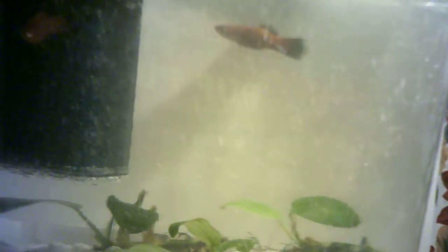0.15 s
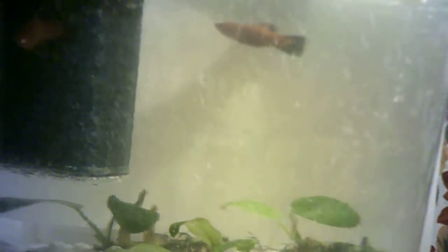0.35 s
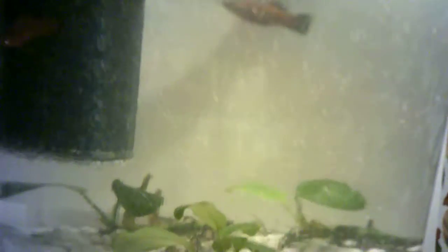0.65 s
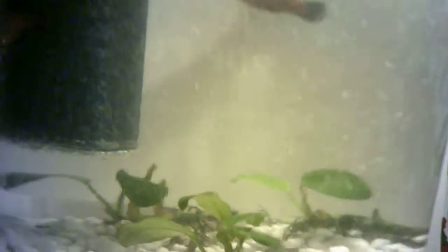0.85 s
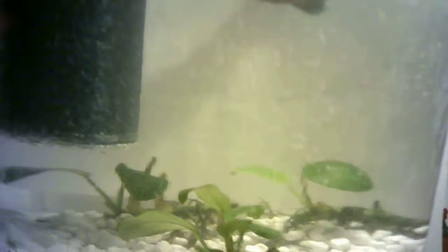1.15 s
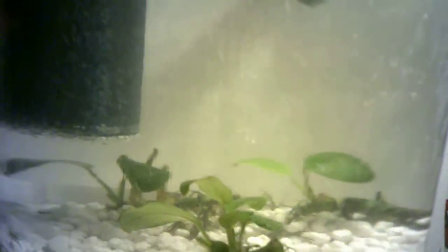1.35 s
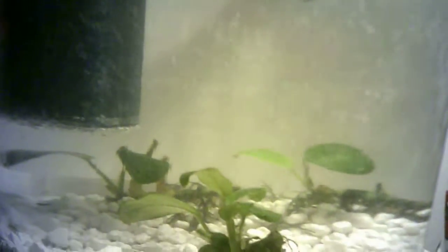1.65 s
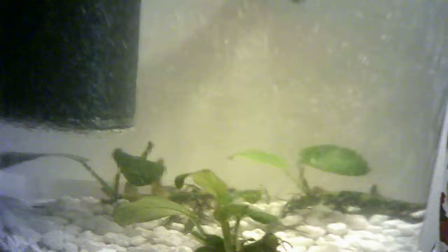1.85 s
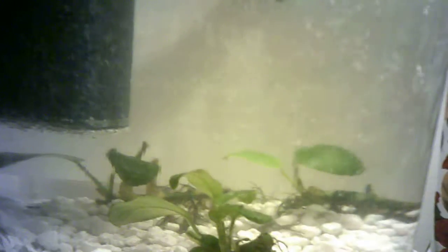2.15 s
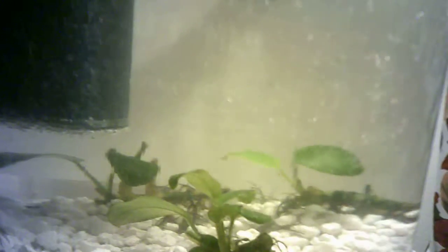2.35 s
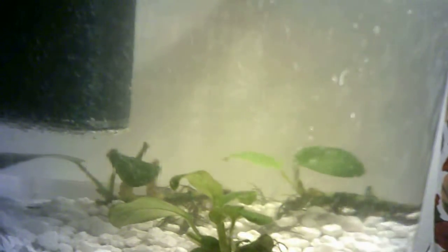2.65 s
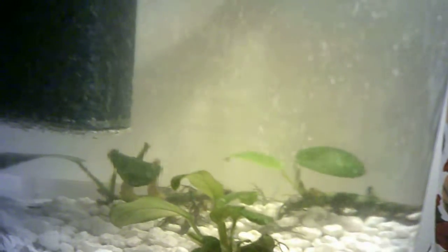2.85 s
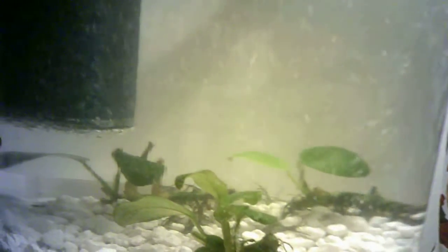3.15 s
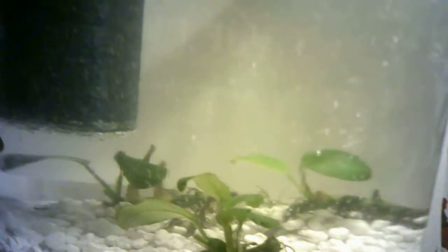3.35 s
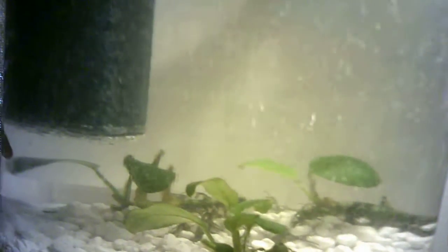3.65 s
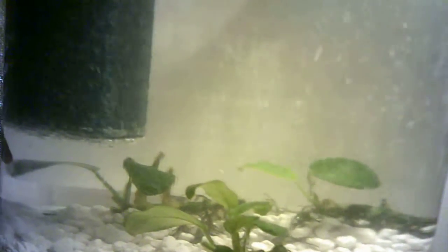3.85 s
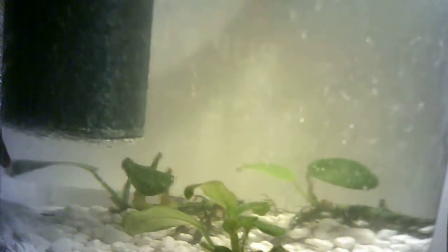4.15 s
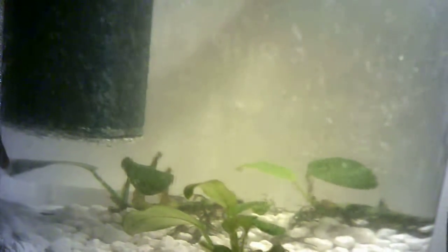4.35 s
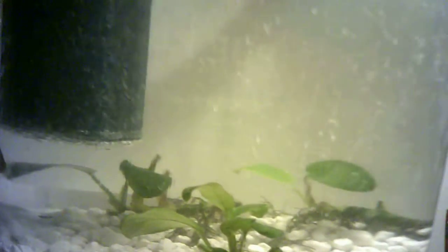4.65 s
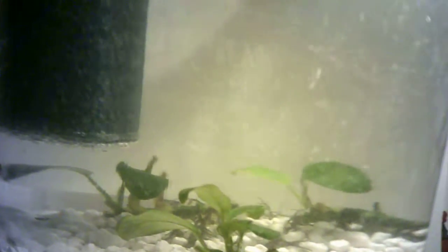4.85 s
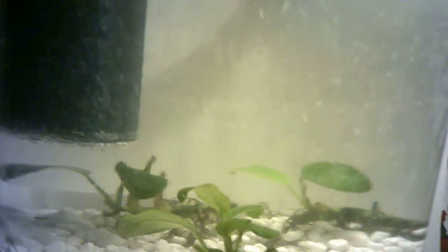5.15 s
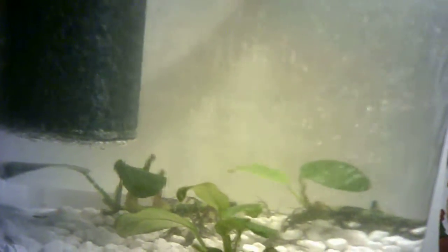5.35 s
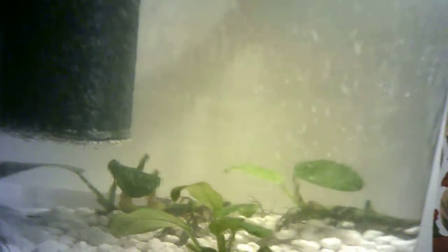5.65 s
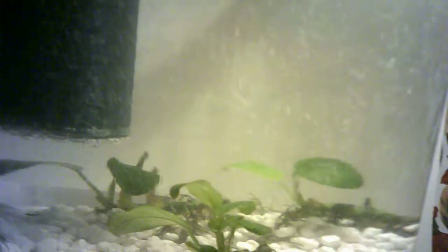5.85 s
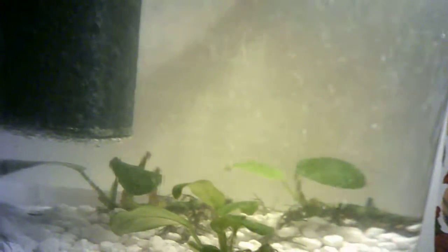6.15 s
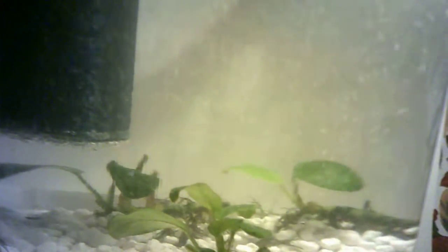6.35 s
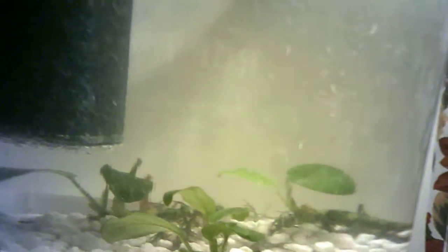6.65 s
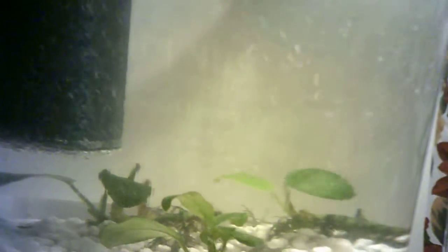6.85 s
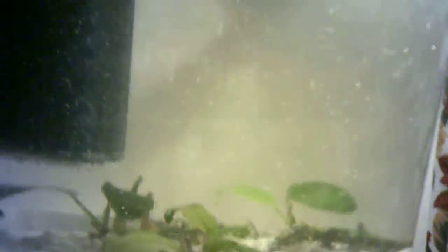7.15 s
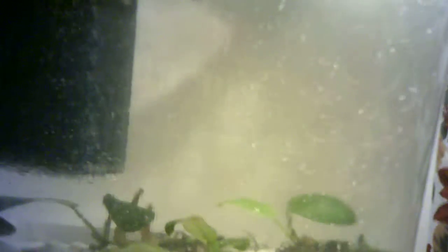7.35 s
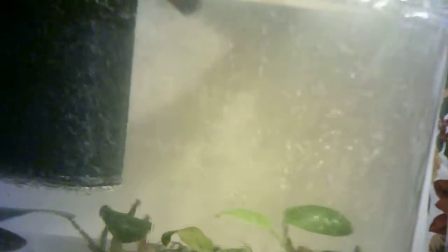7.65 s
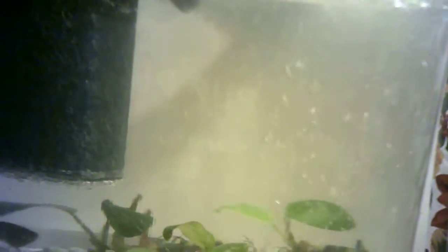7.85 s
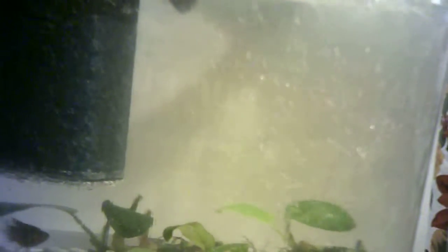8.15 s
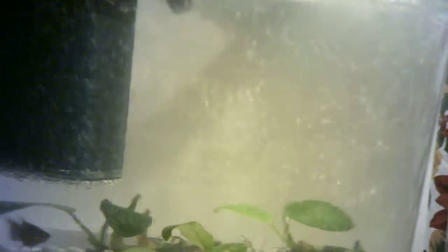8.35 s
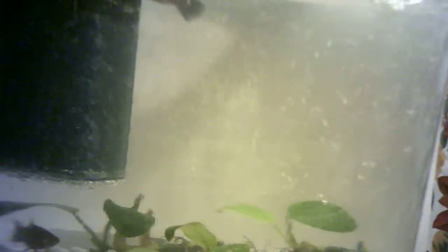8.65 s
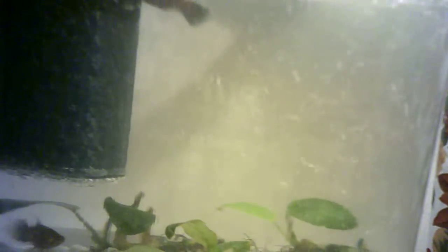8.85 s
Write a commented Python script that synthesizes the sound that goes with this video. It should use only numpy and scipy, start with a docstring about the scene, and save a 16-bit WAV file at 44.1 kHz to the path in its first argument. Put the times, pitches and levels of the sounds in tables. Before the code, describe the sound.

For nine seconds a small aquarium filter runs close to a handheld microphone in a small room. A low mains hum with faint upper tones sits in soft rumbling noise, its lowest tone weakening slightly after 3 s. Over it runs a quiet, continuous fizzing trickle with irregular clear plinks and glassy pings, some mellow, some high and very short. Soft rising gulps of air come at 0.2, 0.8 and 1.2 s, then mainly between 4 and 7.4 s. At about 0.55 s a hand slips in a quick stuttering rasp with a deep bump; a weaker thud comes at 4.1 s. The clearest knock is at 1.2 s, with duller ones near 3, 4, 4.6, 6.3 and 7 s. A distant engine drones outside, booming briefly around 1.7 and 5.1 s, strongest from 5.5 to 7 s, slightly falling in pitch, then receding. The trickle and drips continue to the end.

```python
"""Fish tank in a room: a small filter pump hums, its outflow trickles, pings the glass and swallows air.
A far engine drones past outside, a few knocks sound, a hand slips on the microphone housing and bumps it.
Hum and engine are sums of sines; rush, rasp and knocks are shaped noise.
Bubbles are decaying tones or clicks through resonators; a short noise tail is the room's answer to the water."""
import sys
import numpy as np
from scipy import signal
from scipy.fft import rfft, irfft
from scipy.io import wavfile

SR = 44100
rng = np.random.default_rng(int(sys.argv[2]) if len(sys.argv) > 2 else 0)


def generate_wav(signal):
    """Clip the signal to [-1, 1] and save it as 16-bit WAV at the path in sys.argv[1]."""
    frames = np.transpose(np.atleast_2d(signal))
    scaled = np.clip(frames, -1, 1) * 32767
    pcm = np.round(scaled).astype(np.int16)
    wavfile.write(sys.argv[1], SR, pcm)


N = 396900
TIME = np.arange(N) / SR


def amp(db):
    """Amplitude ratio of a level in dB."""
    return 10 ** (np.asarray(db) / 20)


def rms_one(x):
    """x scaled to an rms of 1."""
    return x / np.sqrt(np.mean(x ** 2) + 1e-20)


def in_time(rows):
    """Columns after the first, interpolated linearly over TIME."""
    s, *columns = np.transpose(rows)
    return [np.interp(TIME, s, column) for column in columns]


def coloured(x, spectrum):
    """x filtered by (hz, db) points joined on a log frequency axis."""
    hz, db = np.transpose(spectrum)
    bins_hz = np.arange(N // 2 + 1) * SR / N + 1e-3  # offset avoids log(0)
    gain = amp(np.interp(np.log(bins_hz), np.log(hz), db))
    return irfft(rfft(x) * gain, N)


def band(x, low_hz, high_hz):
    """Butterworth bandpass."""
    sos = signal.butter(2, [low_hz, min(high_hz, SR / 2.2)], "band", fs=SR, output="sos")
    return signal.sosfilt(sos, x)


def lowpass_both_ways(x, edge_hz):
    """Zero-phase lowpass, so that x minus the result is the rest of the spectrum."""
    return signal.sosfiltfilt(signal.butter(2, edge_hz, fs=SR, output="sos"), x)


def drift(rate_hz):
    """Slow random curve of rms 1: noise through a double pole, run at SR / 40."""
    r = np.exp(-80 * np.pi * rate_hz / SR)
    noise = rng.standard_normal(N // 40 + 2002)
    slow = signal.lfilter([1], [1, -2 * r, r * r], noise)[2000:]  # drop the run-in
    return np.interp(np.arange(N) / 40, np.arange(len(slow)), rms_one(slow))


def resonance(x, hz, width_hz):
    """Two-pole resonator with unit gain near its peak."""
    r = np.exp(-np.pi * width_hz / SR)
    zeros = [(1 - r * r) / 2, 0, (r * r - 1) / 2]
    poles = [1, -2 * r * np.cos(2 * np.pi * hz / SR), r * r]
    return signal.lfilter(zeros, poles, x + 1e-18)


def add(out, start_s, sound):
    """Mix sound into out, in place."""
    at = round(start_s * SR)
    out[at:at + len(sound)] += sound[:N - at]


def grains(per_s, spread_db):
    """Random clicks of uneven size and either sign that come in clumps."""
    sizes = amp(spread_db * np.minimum(rng.exponential(1, N), 5)) * rng.choice([-1, 1], N)
    chance = per_s * amp(2.5 * drift(5)) / SR
    return sizes * (rng.random(N) < chance)


def bubbles(per_s, spread_db, low_hz, high_hz, sharpness):
    """Each grain is dealt to one of 20 bubble sizes; small ones are quieter, all start softly."""
    born, dealt, out = grains(per_s, spread_db), rng.integers(0, 20, N), 0
    for k, hz in enumerate(np.geomspace(low_hz, high_hz, 20)):
        soft_start = resonance(born * (dealt == k), hz, hz / 4)
        out = out + resonance(soft_start, hz, hz / sharpness) * (hz / 1000) ** -.6
    return rms_one(out)


# noise of water, room and street, relative: pitch_hz, density_db [dB per Hz]
RUSH_SPECTRUM = [(8, -8.5), (22, 6.5), (40, -2.5), (63, -9), (110, -14.5), (196, -17), (275, -21),
                 (430, -23), (520, -30.5), (1620, -32.5), (2480, -45), (2830, -40), (3100, -51.5),
                 (4100, -49.5), (4850, -60), (5650, -62.5), (5900, -54.5), (7500, -55.5), (8400, -45.5),
                 (8800, -65.5)]
RUSH_DB = -37
RUMBLE_SWELL_DB, RUMBLE_SWELL_HZ, RUMBLE_FADE_DB_PER_S = 1.5, 1, -0.07


def rush():
    """Shaped noise: the rumble swells slowly as it fades, the bands above flicker."""
    noise = rms_one(coloured(rng.standard_normal(N), RUSH_SPECTRUM))
    rumble = lowpass_both_ways(noise, 200)
    rest = noise - rumble
    out = rumble * amp(RUMBLE_SWELL_DB * drift(RUMBLE_SWELL_HZ) + RUMBLE_FADE_DB_PER_S * TIME)
    for edge_hz in (900, 1800, 3200, 5000):
        part = lowpass_both_ways(rest, edge_hz)
        flicker_db = np.log2(edge_hz / 700) * 1.2 * drift(19)
        out, rest = out + part * amp(flicker_db), rest - part
    top = rest * amp(2.86 * drift(39) + 2.3 * drift(120))
    return amp(RUSH_DB) * (out + top)


# engine's path to the room, points on gliding curves: time_s, level_db, echo_lag_ms, echo_strength [0-1]
ENGINE_PATH = [(0, -65.5, 10.4, 0.6), (.7, -59.5, 11.2, 0.73), (1.5, -54.5, 11.3, 0.28),
               (2.2, -57.5, 14.2, 1), (3, -57.5, 14.5, 0.82), (4, -60.5, 13.7, 0.9), (4.8, -59, 13.2, 0.7),
               (5.5, -48, 15.3, 0.42), (6, -46.5, 17, 0), (6.6, -46.5, 21.3, 0.22),
               (7.2, -47.5, 20.7, 0.27), (8, -52.5, 20.7, 0.5), (9, -56, 18.3, 0.18)]
# firing rate, points on a gliding curve: time_s, firing_hz
FIRING_RATE = [(0, 19.7), (.5, 19.95), (1.5, 20.1), (2.1, 19.5), (4.6, 19.45), (5.5, 19.2), (7.5, 18.47),
               (9, 18.45)]
# firing orders heard: order -> level_db re path level
ORDER_LEVELS = {4: 2.9, 5: 6.56, 6: -1.7, 7: 0.57, 8: 0.7, 9: 3.5, 10: -6.5, 11: -9.5}
# room mode booming now and then: peak_s, level_db, width_s
BOOM_SWELLS = [(1.03, -51, 0.16), (1.7, -45.5, 0.21), (3.45, -47, .1), (4.65, -51, 0.28), (5.15, -41, 0.33)]
BOOM_HZ = 158.9


def engine():
    """Low firing orders; a wall echo of shifting lag lifts some, cancels others; a room mode booms."""
    (firing_hz,), (level_db, lag_ms, echo) = in_time(FIRING_RATE), in_time(ENGINE_PATH)
    turn = 2 * np.pi * np.cumsum(firing_hz) / SR
    late = 2 * np.pi * firing_hz * lag_ms / 1000
    orders = 0
    for order, db in ORDER_LEVELS.items():
        phase = order * turn + rng.uniform(0, 2 * np.pi)
        both = np.sin(phase) + np.clip(echo, 0, 1) * np.sin(phase - order * late)
        orders = orders + np.sqrt(2) * amp(level_db + db + 1.5 * drift(2.2)) * both
    boom = resonance(resonance(rng.standard_normal(N), BOOM_HZ, 9), BOOM_HZ, 9)
    swells = sum(amp(db) * np.exp(-((TIME - s) / width_s) ** 2) for s, db, width_s in BOOM_SWELLS)
    return orders + swells * rms_one(boom)


# knocks in the room: start_s, level_db, low_hz, high_hz, t60_s, bright_db [re body]
KNOCK_EVENTS = [(1.22, -32, 1243, 1917, 0.11, -10.5), (2.981, -43, 870, 1300, .13, -20),
                (3.997, -45, 1520, 2390, 0.056, -15), (4.112, -42.5, 726, 1500, 0.19, -22),
                (4.572, -36, 778, 1740, 0.21, -30), (6.271, -40.5, 1120, 1364, 0.19, -9),
                (6.386, -55, 990, 1200, .084, -28), (6.966, -51, 2240, 2880, .1, -11)]
RINGS, RING_DB = 5, -7.5  # pitches within a knock, level re knock


def knocks():
    """A noise burst builds in a few ms and dies; pitches within its band ring in quick succession."""
    out, t = np.zeros(N), TIME[:SR // 3]
    noise = rng.standard_normal((len(KNOCK_EVENTS), 2, len(t)))
    chance = rng.random((len(KNOCK_EVENTS), RINGS, 2))
    for (s, db, low_hz, high_hz, t60_s, bright_db), (dull, crisp), rings in zip(KNOCK_EVENTS, noise, chance):
        bright = band(band(crisp, 2000, 2950) + band(crisp, 3500, 3960), 1900, 5400)
        narrow = band(band(dull, low_hz, high_hz), low_hz, high_hz)
        body = rms_one(band(narrow, low_hz * 0.54, high_hz))
        decay = amp(-60 * t / t60_s) + .5 * amp(-60 * t / 0.064)
        shape = np.minimum(t / 0.0085, 1) ** 2 * decay
        add(out, s, amp(db) * shape * (body + amp(bright_db) * rms_one(bright)))
        for k, (pitch, late) in enumerate(rings):
            hz = low_hz + (high_hz - low_hz) * (k + pitch) / RINGS
            envelope = amp(db + RING_DB - 60 * t / 0.12) * np.minimum(t / 0.0045, 1)
            add(out, s + 0.00296 + 0.024 * late, envelope * np.sin(2 * np.pi * hz * t))
    return out


# hand slipping in three catches: start_s, level_db [before the slide], length_s
SLIP_CATCHES = [(0.532, -28, 0.023), (0.559, -35, .016), (0.576, -35.5, 0.0237)]
# rasp of skin, relative: pitch_hz, density_db [dB per Hz]
SLIP_SPECTRUM = [(240, -43), (400, -13), (869, -10.5), (1110, -16), (1720, -7.5), (2230, -14),
                 (2890, -10.5), (3990, -9.5), (5040, -24), (7430, -24.5), (8790, -12), (11400, -67),
                 (19300, -120)]
# housing resonance, one row: pitch_hz, width_hz, level_db [re rasp]
HOUSING_RING = (2890, 180, 10.6)
# shoves on the microphone: start_s, level_db, pitch_hz [once settled], t60_s
SHOVES = [(.538, -15, 20, .22), (4.087, -23, 20, .25)]
CATCH_S, SLIDE_DB_PER_S, LET_GO_S = 0.0072, -250, 0.0061


def slip():
    """Skin rasps over the housing; shoves reach the capsule as low swings that die away."""
    hz, width_hz, ring_db = HOUSING_RING
    grip_and_release_db = 0.94 * rng.standard_normal(N // 60 + 1).repeat(60)[:N]
    catching = rng.standard_normal(N) * amp(grip_and_release_db)
    rasp = rms_one(coloured(catching, SLIP_SPECTRUM))
    rasp = rms_one(rasp + amp(ring_db) * resonance(rasp, hz, width_hz))
    grip = 0
    for s, db, length_s in SLIP_CATCHES:
        level = amp(db + SLIDE_DB_PER_S * np.clip(TIME - s, 0, length_s))
        catch = np.clip((TIME - s) / CATCH_S, 0, 1)
        let_go = np.clip((s + length_s - TIME) / LET_GO_S + 1, 0, 1)
        grip = grip + level * catch * let_go
    out, t = grip * rasp, TIME[:SR // 4]
    for s, db, hz, t60_s in SHOVES:
        turns = hz * t + .28 * (1 - np.exp(-t / .006))  # first swing is quickest
        add(out, s, -amp(db - 60 * t / t60_s) * np.sin(2 * np.pi * turns))
    return out


# pump coil, near multiples of the mains: pitch_hz, level_db [rms]; sag is added to the lowest
HUM_LINES = [(59.9, -41), (119.8, -57), (239.6, -57.5), (300, -54.5), (360, -63.5), (420, -64.5),
             (480, -69), (540, -78), (660, -69), (780, -72.5), (840, -78), (900, -72.5), (960, -75.5),
             (1020, -71.5)]
# sag of the lowest line, points on a gliding curve: time_s, change_db
LOWEST_LINE_SAG = [(0, 2.5), (2.3, 2), (3.2, -1.5), (5, -1), (9, -2.5)]


def hum():
    """Coil lines waver slightly in level and phase with the load on the impeller; the lowest sags."""
    lines = []
    for hz, db in HUM_LINES:
        level = np.sqrt(2) * amp(db + 0.76 * drift(6.1))
        phase = 2 * np.pi * hz * TIME + 0.3 * drift(7.4) + rng.uniform(0, 2 * np.pi)
        lines.append(level * np.sin(phase))
    lowest, *rest = lines
    return lowest * amp(in_time(LOWEST_LINE_SAG)[0]) + sum(rest)


# glass modes: pitch_hz, width_hz, level_db [re PINGS_DB]
GLASS_MODES = [(1580, 22, -3.5), (2170, 60, -4.5), (2763, 54, -2.5), (3530, 75, -7.5), (3880, 99, -10)]
# levels before the lowpass
FIZZ_DB, FIZZ_PER_S = -66, 400
PLINKS_DB, PLINKS_PER_S = -62, 80
PINGS_DB, PINGS_PER_S = -65, 70  # rate per mode


def trickle():
    """A fizz of short bubbles, sparser clear plinks, and drops that set the glass modes ringing."""
    fizz = bubbles(FIZZ_PER_S, spread_db=4.0, low_hz=1200, high_hz=4280, sharpness=8.2)
    plinks = bubbles(PLINKS_PER_S, spread_db=1.8, low_hz=1100, high_hz=2800, sharpness=35.0)
    pings = 0
    for hz, width_hz, db in GLASS_MODES:
        push = rms_one(grains(PINGS_PER_S, spread_db=3.5)) + .5 * rng.standard_normal(N)
        ring = resonance(resonance(push, hz, width_hz * 5), hz, width_hz)
        pings = pings + amp(db) * rms_one(ring)
    mix = amp(FIZZ_DB) * fizz + amp(PLINKS_DB) * plinks + amp(PINGS_DB) * pings
    return signal.sosfilt(signal.butter(6, 4400, fs=SR, output="sos"), mix)


# swallowed air pockets: start_s, level_db [peak], pitch_hz [mid-glide]
AIR_POCKETS = [(.200, -32, 393), (0.787, -41.5, 410), (1.180, -42.5, 400), (4.125, -49, 353),
               (5.080, -43.5, 348), (5.696, -40.5, 345), (5.742, -45, 320), (6.195, -46.5, 346),
               (6.632, -39, 403), (7.182, -43, 400), (7.363, -38.5, 403)]
GULP_S = .035


def gulps(rise):
    """A large pocket of air: a soft low note gliding up by the share rise as it nears the surface."""
    out, t = np.zeros(N), TIME[:round(GULP_S * SR)]
    for s, db, hz in AIR_POCKETS:
        pitch_hz = hz * (1 + rise * (t / GULP_S - .5))
        tone = np.sin(2 * np.pi * np.cumsum(pitch_hz) / SR)
        add(out, s, amp(db) * np.sin(np.pi * t / GULP_S) * tone)
    return out


# clear single bubbles and drips: swell_end_s, level_db, pitch_hz
DRIP_EVENTS = [(0.035, -37.5, 1614), (.096, -41, 3500), (.138, -38, 3700), (.630, -40, 1670),
               (1.557, -45, 1570), (1.617, -42, 1580), (1.717, -43.5, 1580), (1.785, -39.5, 1010),
               (2.175, -35, 2170), (2.246, -44, 3320), (2.316, -44, 1580), (2.469, -39.5, 1570),
               (2.529, -45, 1580), (2.559, -44, 1570), (2.618, -36.5, 1595), (2.780, -40, 3710),
               (2.864, -33.5, 3700), (2.917, -42.5, 1580), (3.199, -41, 1606), (3.399, -41.5, 2170),
               (3.693, -37.5, 2710), (3.826, -43.5, 1580), (4.207, -45.5, 2170), (4.220, -44.5, 1600),
               (4.255, -37.5, 2760), (4.404, -34.5, 3630), (4.638, -42, 3670), (4.682, -41, 3680),
               (4.785, -43, 1660), (4.944, -39.5, 1580), (5.387, -46, 2170), (5.435, -38, 3480),
               (5.496, -38.5, 3560), (5.66, -40, 2750), (5.687, -42, 1473), (5.768, -35.5, 3750),
               (5.905, -42.5, 2170), (5.964, -39, 1234), (6.076, -40, 3740), (6.458, -43, 2400),
               (6.490, -44, 2220), (6.572, -36.5, 1583), (6.725, -43, 2760), (6.744, -35, 1670),
               (6.853, -42.5, 1600), (7.035, -37, 3600), (7.071, -41.5, 1670), (7.119, -43, 1670),
               (7.225, -45, 1570), (7.467, -44.5, 1580), (7.550, -43, 2230), (7.716, -32, 3900),
               (7.989, -41.5, 3900), (8.005, -41, 1606), (8.139, -39, 2330), (8.467, -40, 3720),
               (8.732, -45.5, 1620), (8.894, -32.5, 1580)]
# glass modes ringing after a drip near their pitch: pitch_hz, width_hz, level_db
GLASS_AFTER_RING = [(1582, 11, 3), (2165, 14, 3)]
# t60 and swell of drips below the corner; above it they shorten by a power of pitch
DRIP_T60_S, DRIP_SWELL_S, DRIP_CORNER_HZ, DRIP_SHORTENING = 0.052, 0.002513, 1955, 2.6


def drips():
    """Each bubble swells quickly and rings down at its own pitch; glass modes near it sing on."""
    out, t = np.zeros(N), TIME[:SR // 4]
    for s, db, hz in DRIP_EVENTS:
        short = min(DRIP_CORNER_HZ / hz, 1) ** DRIP_SHORTENING
        swell_s = DRIP_SWELL_S * np.sqrt(short)
        swell = np.sin(np.pi / 2 * np.minimum(t / swell_s, 1)) ** 2
        decay = amp(db - 60 * t / (DRIP_T60_S * short))
        add(out, s - swell_s, decay * swell * np.sin(2 * np.pi * hz * t))
    return out + sum(amp(db) * resonance(out, hz, width_hz) for hz, width_hz, db in GLASS_AFTER_RING)


ROOM_T60_S, ROOM_DB = 0.1, -10


def room(x):
    """Room answer: x convolved with a short tail of dying noise of unit energy."""
    t = TIME[:SR // 2]
    tail = rng.standard_normal(len(t)) * amp(-60 * t / ROOM_T60_S) * (t > .004)
    return signal.fftconvolve(x, tail / np.sqrt(np.sum(tail ** 2)))[:N]


def scene():
    """Sum of all sources; only the water excites the room tail."""
    background = rush() + engine() + knocks() + slip() + hum()
    water = trickle() + gulps(rise=0.24) + drips()
    return (background + water + amp(ROOM_DB) * room(water))[None]


CUTOFF_HZ = 8900


def record(dry):
    """Steep Chebyshev lowpass cuts the top."""
    return signal.sosfilt(signal.cheby2(14, 80, CUTOFF_HZ * 1.04, fs=SR, output="sos"), dry)


dry = scene()
out = record(dry)
generate_wav(out)
```